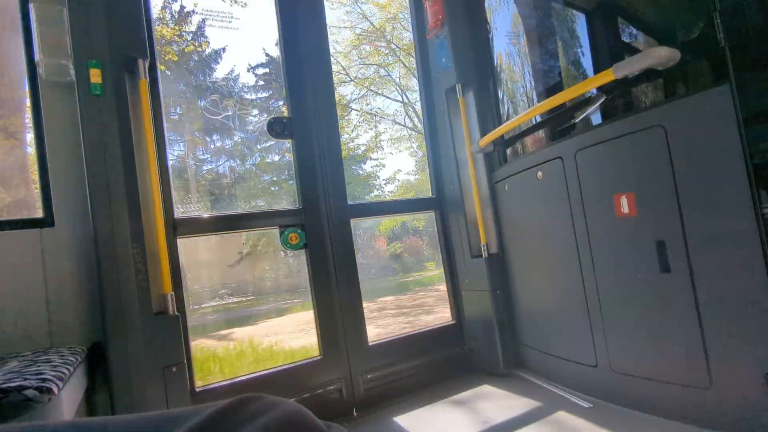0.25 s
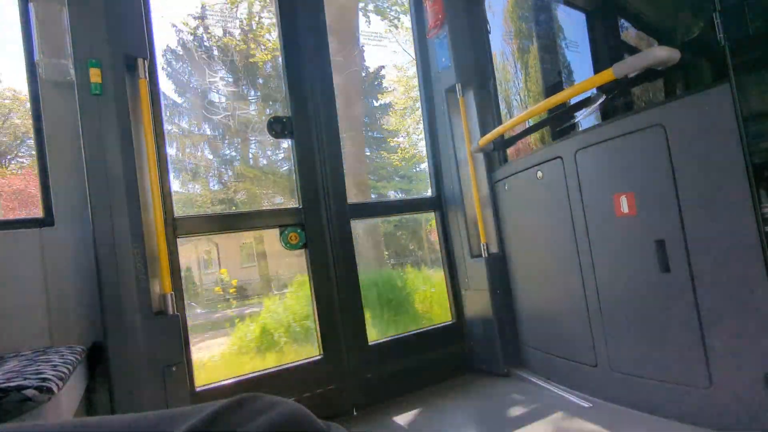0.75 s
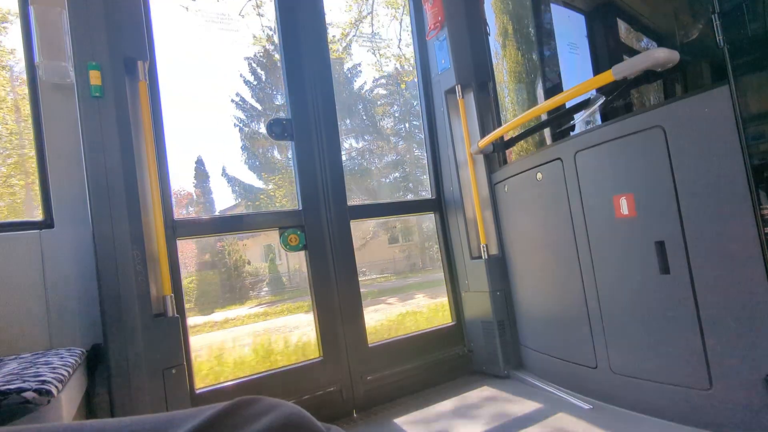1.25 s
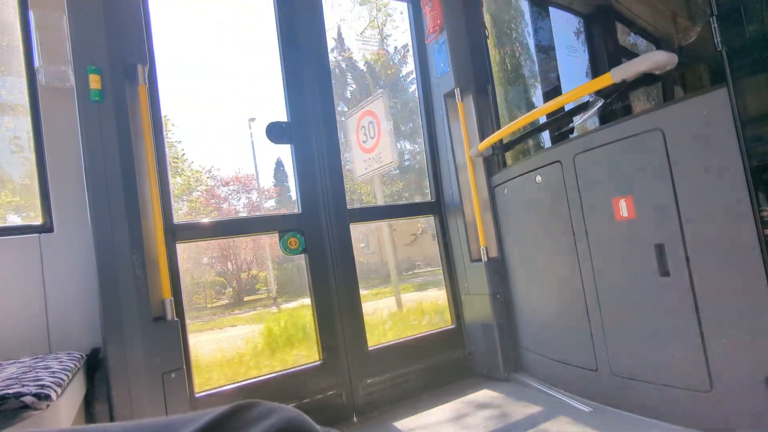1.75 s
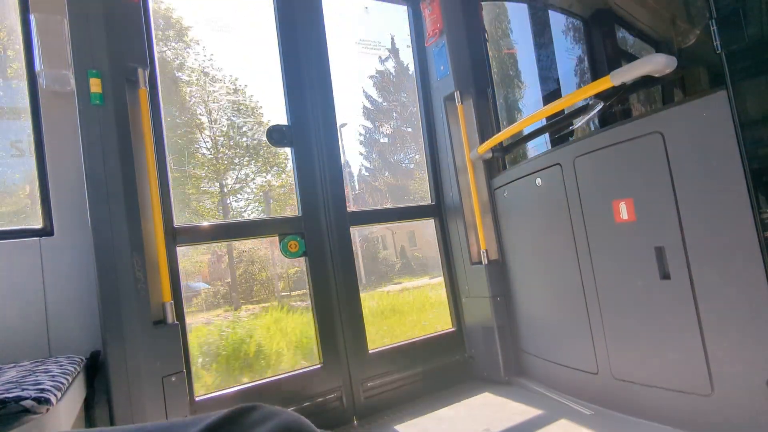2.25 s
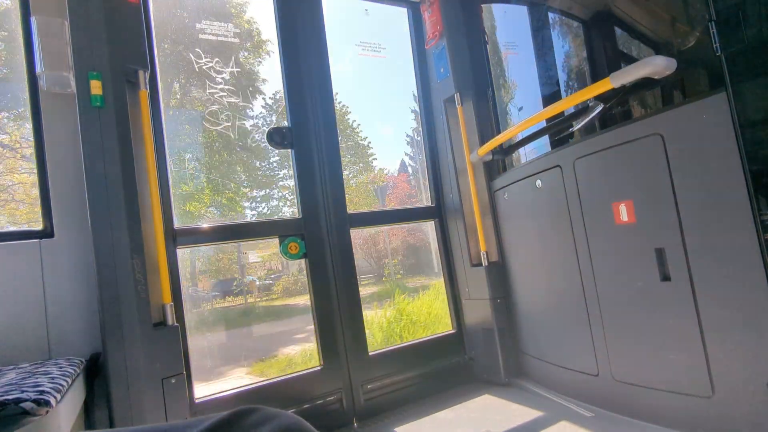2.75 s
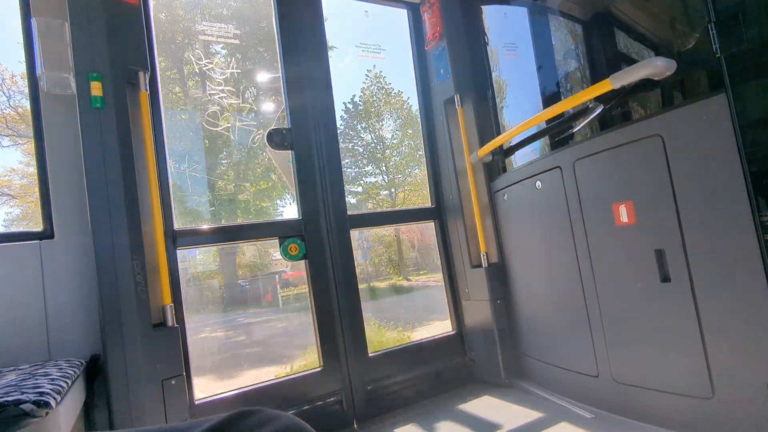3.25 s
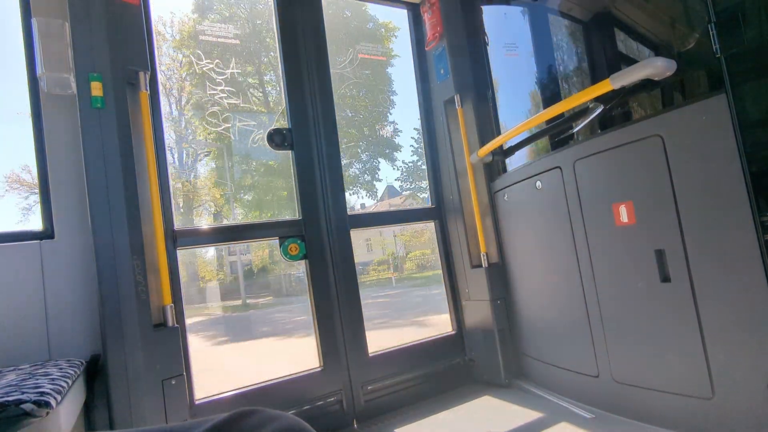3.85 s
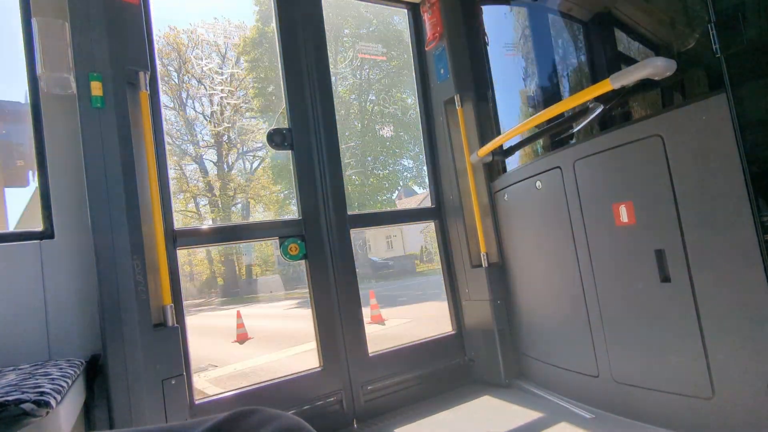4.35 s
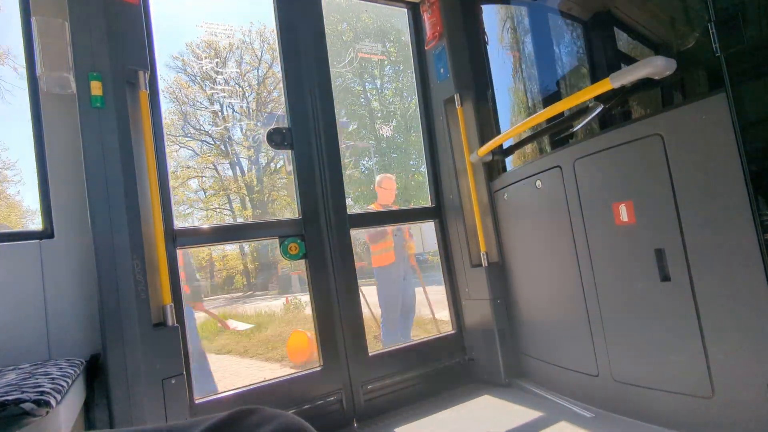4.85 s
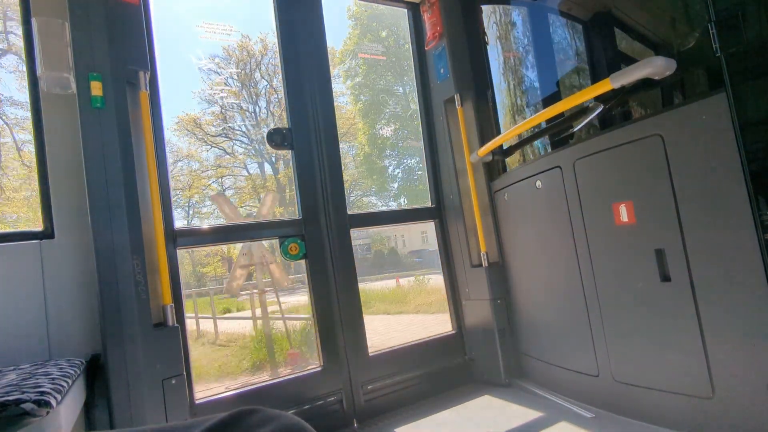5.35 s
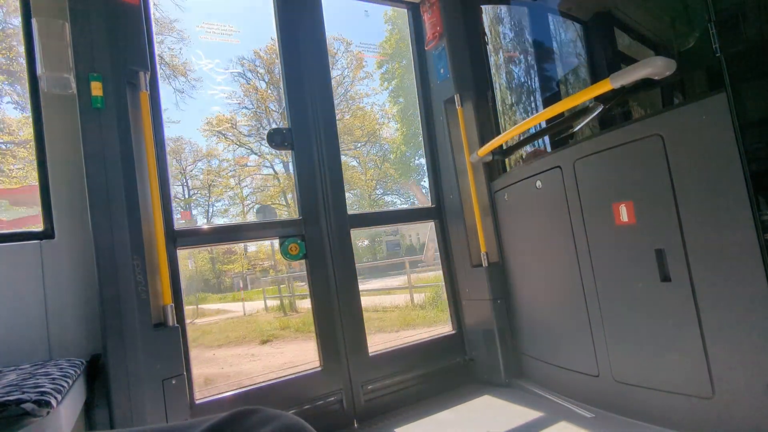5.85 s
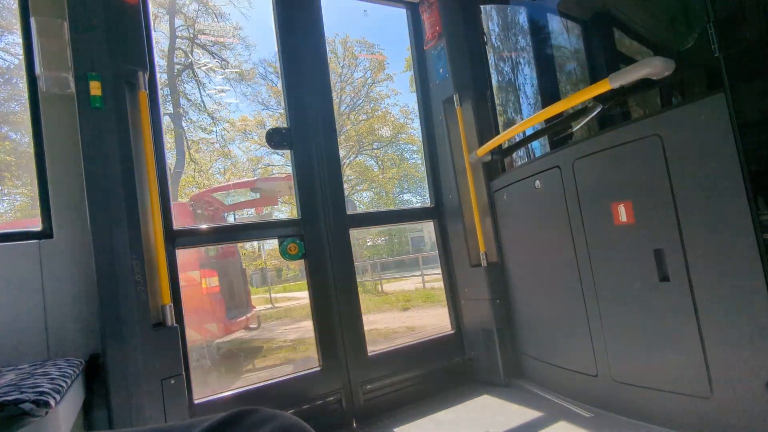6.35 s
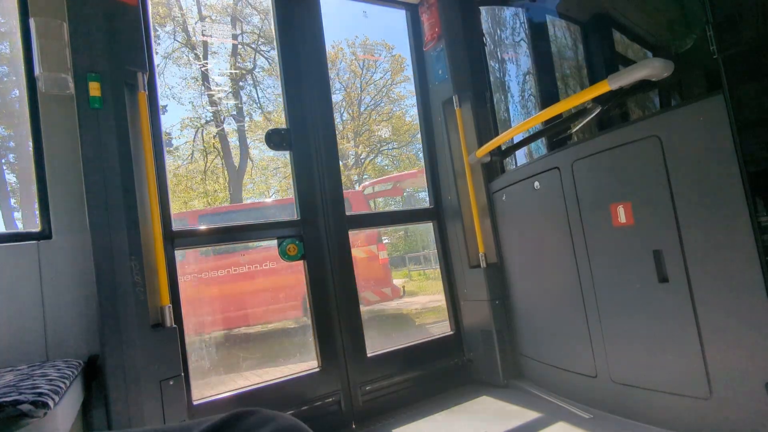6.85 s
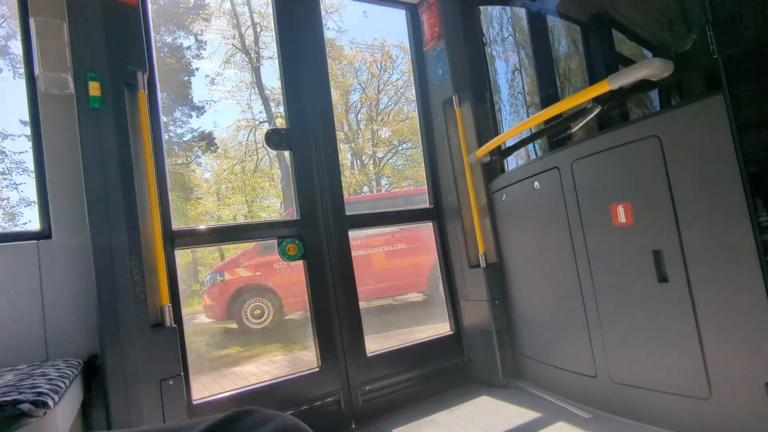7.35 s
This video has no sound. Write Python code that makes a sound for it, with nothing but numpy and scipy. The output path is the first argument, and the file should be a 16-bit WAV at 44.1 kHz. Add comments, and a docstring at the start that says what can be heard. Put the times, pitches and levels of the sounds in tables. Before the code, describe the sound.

Inside a braking tram, wheels roar over a rough crossing with dull thuds, clacks and rattling door fittings, while the motor whine sinks in pitch.

```python
"""Braking tram on a rough crossing

Inside a tram that brakes gently over a rough road crossing, heard from a seat by the door. Filtered noise
makes the wheel roar; short low swings and swells of noise make the blows from the rail. Bursts of ticks make
loose door fittings rattle, after a soft fading hiss at the start. Drive tones fall with the speed, and a wheel
sings briefly three times. Beneath lie steady ventilation (noise and hum), the noisy rush of the converter and
the thin two-tone whistle of the inverter."""
import sys
import numpy as np
from scipy import signal
from scipy.fft import rfft, irfft
from scipy.io import wavfile
from scipy.ndimage import uniform_filter1d

SR = 44100
rng = np.random.default_rng(int(sys.argv[2]) if len(sys.argv) > 2 else 0)


def log_audio(samples):
    """Write samples as a 16-bit WAV file to the path given in sys.argv[1]."""
    # one column per channel
    frames = np.atleast_2d(samples).T
    # limit to full scale, then quantise
    limited = np.clip(frames, -1, 1)
    pcm = np.round(limited * 32767).astype(np.int16)
    wavfile.write(sys.argv[1], SR, pcm)


N = 334719
TAPS = 8192  # filter length in samples
TIME = np.arange(N) / SR
FREQ = np.arange(TAPS + 1) * SR / (2 * TAPS)
LEFT_LAG_S = .00034  # sound from the right reaches the left ear this much later


def undb(db):
    """Turn decibels into a gain."""
    return 10 ** (np.asarray(db) / 20)


def unit(x):
    """Scale to rms 1."""
    return x / np.sqrt(np.mean(x ** 2))


def curves(rows):
    """Join the columns of a table by straight lines in time."""
    s, *columns = np.transpose(rows)
    return [np.interp(TIME, s, column) for column in columns]


def contour(points):
    """Join points by straight lines on a log-frequency axis."""
    hz, value = np.transpose(points)
    return np.interp(np.log(FREQ + 1), np.log(hz), value)


def lift(at_hz, rings):
    """What a set of resonances adds at a frequency, in dB."""
    return sum(db / (1 + (2 * (at_hz - hz) / width) ** 2) for hz, width, db in rings)


def colour(x, spectrum, rings=()):
    """Give noise a broad spectrum with narrow resonances on it; white noise keeps its level."""
    db = contour(spectrum) + lift(FREQ, rings)
    # minimum phase: the filter responds at once and never ahead of its input
    cepstrum = irfft(np.log(undb(db)))[:TAPS]
    response = irfft(np.exp(2 * rfft(cepstrum, 2 * TAPS) - cepstrum[0]))[:TAPS]
    return signal.oaconvolve(x, response[None] / np.linalg.norm(response))[:, :N]


def weigh(x, gain, size=2048):
    """Filter one channel with a smooth complex gain over frequency."""
    response = np.roll(irfft(gain), size)[:2 * size + 1]
    return signal.oaconvolve(x, response, mode="same")


def walk(rate, size=6):
    """Wander smoothly at random: levels held 1 / rate s, then slewed twice; spread 1."""
    held = np.repeat(rng.standard_normal(int(TIME[-1] * rate) + 2), size)
    slewed = unit(uniform_filter1d(uniform_filter1d(held, size), size))
    return np.interp(TIME * rate * size, np.arange(len(slewed)), slewed)


# How alike the noise is at the two ears: f/Hz, correlation (1 is identical)
EAR_LIKENESS = [(40, .94), (120, .94), (290, .9), (600, .72), (1000, .45), (1500, .35), (3000, .15),
                (8000, .25), (15000, .3)]


def field():
    """White noise from all around: alike at both ears in the bass, mostly unrelated in the treble."""
    alike = np.clip(contour(EAR_LIKENESS), -.99, .99)
    mid = weigh(rng.standard_normal(N), np.sqrt((1 + alike) / 2))
    side = weigh(rng.standard_normal(N), np.sqrt((1 - alike) / 2))
    return np.array([mid + side, mid - side])


def tone(hz, waver, waver_hz):
    """A line whose strength and phase wander at each ear as the paths through the cabin shift."""
    phase = (2 * np.pi * (np.cumsum(hz + 0 * TIME) / SR % 1)).astype(np.float32)
    cos, sin = np.cos(phase), np.sin(phase)
    ears = [cos + waver * (cos * walk(waver_hz) + sin * walk(waver_hz)) for ear in range(2)]
    return unit(np.array(ears))


def swell(age, rise_s):
    """The envelope of a blow: up to 1 in rise_s, then dying away."""
    return age / rise_s * np.exp(1 - age / rise_s)


def add(track, s, sound):
    """Mix a short sound into a track at s seconds."""
    part = track[int(s * SR):][:len(sound)]
    part += sound[:len(part)]


def braking(start_s=2.2, ramp_s=4.1):
    """Brake effort from 0 to 1: it comes on evenly and then stays full."""
    return np.clip((TIME - start_s) / ramp_s, 0, 1)


# Gear mesh tone at the start, and how fast drag and the full brake lower it
MESH_HZ, COAST_HZ_PER_S, BRAKE_HZ_PER_S = 701, 4.4, 86


def speed():
    """Speed as a share of the speed at the start: drag and the brake wear it down."""
    return 1 - np.cumsum(COAST_HZ_PER_S + BRAKE_HZ_PER_S * braking()) / SR / MESH_HZ


# Track, smooth, paved, crossing, smooth: t/s, rumble level/dB, rail hiss level/dB (before trims)
TRACK_ROUGHNESS = [(0, -30.5, -46.5), (.65, -29.5, -48), (1, -31, -48.5), (1.63, -32, -47.5),
                   (1.74, -22, -50), (1.92, -21, -45), (2.05, -16.5, -39.5), (3.2, -14, -38),
                   (3.55, -11, -36.5), (4.35, -12.5, -38), (4.9, -11.5, -41), (5.2, -14, -40),
                   (5.38, -20.5, -45.5), (5.7, -19.5, -45), (5.95, -21.5, -49), (6.5, -18, -45.5),
                   (7.05, -22.5, -51.5), (7.59, -24, -59)]
# Colours of floor boom, body rumble, wheel roar and rail hiss: f/Hz, relative level/dB (per Hz)
BOOM_COLOUR = [(15, -54), (25, -31), (32, -36), (45, -9.5), (58, 20.5), (68, 17.5), (85, 14), (130, -47.5)]
RUMBLE_COLOUR = [(40, -25.5), (62, -7.5), (80, -1), (95, 1.5), (140, -3), (190, -11), (300, -27.5),
                 (500, -79)]
ROAR_COLOUR = [(120, -31.5), (220, -3.5), (280, -1.5), (400, -6.5), (600, -7.5), (700, -9), (820, -19.5),
               (1100, -46), (2000, -76)]
RAIL_COLOUR = [(500, -16.5), (850, 6), (1250, 0), (1600, -0.5), (2050, -4), (2500, -14), (3300, -16.5),
               (5000, -20), (9000, -33.5), (15500, -43)]
# Resonances of the car body: f/Hz, width/Hz, lift level/dB (negative is a dip)
BODY_RINGS = [(91, 9, 4.5), (121.3, 8.5, -4.5), (139.3, 33, 5), (182.8, 25.7, 5), (214, 6.8, 4),
              (270.3, 25.6, 6.5), (328.7, 15.4, 5), (394, 28, 4.5), (434, 22, -3), (467.7, 27, 6.5),
              (586.5, 21, 5), (1100, 14, 1.5), (1620, 25, 5)]


def rolling(boom_db=-26, boom_follow=0.27, rumble_db=-2, hiss_db=-0.5):
    """Rough rail shakes the body: boom and rumble below, juddering roar and hiss above."""
    rumble, hiss = curves(TRACK_ROUGHNESS)
    boom = boom_follow * rumble + boom_db
    # the roar follows the rumble and eases as the tram slows
    roar = 0.77 * rumble - 15 * (1 - speed()) - 10
    judder = 0.34 * walk(60)  # dB; the hiss judders 2.6 times as deeply as the roar
    floor = colour(field(), BOOM_COLOUR) * undb(boom)
    body = colour(field(), RUMBLE_COLOUR, BODY_RINGS) * undb(rumble + rumble_db)
    wheels = colour(field() * undb(judder), ROAR_COLOUR, BODY_RINGS) * undb(roar)
    rail = colour(field() * undb(2.6 * judder), RAIL_COLOUR, BODY_RINGS) * undb(hiss + hiss_db)
    return floor + body + wheels + rail


# Gear tones: f as a multiple of the mesh, coasting level/dB, change of level/dB under full brake
GEAR_TONES = [(1, -49, 7), (2, -60, -3), (3.965, -79, 15)]
# The motor's slot whistle and its side line: f as a multiple of the mesh, relative level/dB
SLOT_TONES = [(7.338, 0), (7.51, -10)]
# Strength of the slot whistle: t/s, level/dB before resonances
SLOT_LEVEL = [(0, -64), (3, -66.5), (4.8, -58.5), (5.2, -67), (7.59, -83)]
# Resonances of the drive's casing and mounts: f/Hz, width/Hz, lift level/dB
MOUNT_RINGS = [(448, 20, 8), (498.5, 21, 11.5), (560, 34, 11), (1010, 24, 14), (1107, 30, 12),
               (1359, 41, 14.5), (4490, 190, 12.5), (4760, 60, 6.5), (4978, 22, 8), (5050, 26, 7.5),
               (5112, 16, 5.5)]
# Air whistling through the motor: t/s, level/dB
MOTOR_AIR_LEVEL = [(0, -54.5), (1.7, -56.5), (3, -89), (5, -85), (7.59, -64)]
# Its colour: f/Hz, relative level/dB (per Hz)
MOTOR_AIR_COLOUR = [(1500, -36), (1900, -2), (2120, 4.5), (2280, -9), (2500, -55.5)]


def drive():
    """Gear and slot tones fall with the speed and swell in each resonance; motor air fades, then returns."""
    hz = MESH_HZ * speed() * (1 + 0.00029 * walk(12))
    effort = braking()
    gear, slots = 0, 0
    for multiple, db, load_db in GEAR_TONES:
        level = db + load_db * effort + lift(multiple * hz, MOUNT_RINGS)
        gear = gear + tone(multiple * hz, waver=.65, waver_hz=26) * undb(level)
    for multiple, db in SLOT_TONES:
        level = db + lift(multiple * hz, MOUNT_RINGS)
        slots = slots + tone(multiple * hz, waver=.35, waver_hz=36) * undb(level)
    air = colour(field(), MOTOR_AIR_COLOUR) * undb(curves(MOTOR_AIR_LEVEL)[0])
    return gear + slots * undb(curves(SLOT_LEVEL)[0]) + air


# Bursts of chatter from the door fittings, after a soft fading hiss at the start (first row):
# t/s, peak level/dB before bounce, build-up t/s
RATTLE_BURSTS = [(0, -59, 0.17), (1.962, -59, .008), (2.21, -51, 0.054), (2.51, -49.5, .06),
                 (2.8, -57, 0.044), (2.998, -46, .003), (3.028, -47.5, .004), (3.145, -47, .004),
                 (3.178, -51, .003), (3.21, -49, .003), (3.256, -43.5, 0.013), (3.303, -31, .11),
                 (3.56, -44.5, 0.093), (3.69, -44, 0.057), (3.905, -40.5, .035), (4.17, -43.5, 0.11),
                 (4.48, -46.5, 0.076), (4.8, -44.5, .05), (4.89, -46, 0.055), (5.228, -53, .01),
                 (6.465, -46, 0.022), (6.515, -40.5, 0.0054), (6.538, -44, 0.01), (7.12, -58, .008)]
# Colour of the fittings: f/Hz, relative level/dB (per Hz)
FITTING_COLOUR = [(500, -35), (1200, -3), (2100, 15.5), (2700, 6), (3500, 7.5), (5000, 4), (6300, 4),
                  (7500, 3), (9400, -0.5), (11500, -2.5), (14500, -7), (15700, -16)]
# Their resonances: f/Hz, width/Hz, lift level/dB
RINGS_OF_FITTINGS = [(2840, 50, 4), (3260, 40, 4), (3424, 30, 7), (5940, 50, 4), (7422, 30, 7),
                     (9008, 30, 7), (9250, 140, 3), (9800, 40, 6)]


def rattle(ticks_per_s=3600, fall_s=0.063, cabin_db=1, panel_db=-5):
    """After a soft fading hiss, loose fittings bounce in bursts of ticks, in a wash of reflections."""
    power, age = np.zeros(N), TIME[:SR // 2]
    for s, db, rise_s in RATTLE_BURSTS:
        fall = np.exp(-np.maximum(age - rise_s, 0) / fall_s)
        add(power, s, np.minimum(age / rise_s, 1) * (undb(db) * fall) ** 2)
    shake = np.sqrt(power) * undb(1.4 * walk(85))  # bouncing wavers the level
    ticks = unit((rng.random(N) < ticks_per_s / SR) * np.sign(rng.standard_normal(N)))
    # the ticks reach the left ear a little later
    ears = np.array([np.roll(ticks, int(LEFT_LAG_S * SR)), ticks])
    chatter = unit(ears + undb(cabin_db) * field()) * shake
    fittings = colour(chatter, FITTING_COLOUR, RINGS_OF_FITTINGS)
    panels = colour(field() * shake, RAIL_COLOUR, BODY_RINGS) * undb(panel_db)
    return fittings + panels


# Colour of the ventilation: f/Hz, relative level/dB (per Hz)
VENT_COLOUR = [(200, 9), (700, 0), (1100, 0.5), (1700, -12), (3000, -7.5), (4200, -22.5), (5000, -17),
               (6000, -10.5), (7000, -24.5), (7700, -14.5), (9000, -57), (15500, -38)]
# Its humps: f/Hz, width/Hz, lift level/dB
VENT_RINGS = [(1147, 4.6, 18), (5300, 200, 3.3), (9760, 120, 8)]
# Hum of the blowers: f/Hz, level/dB
BLOWER_HUM = [(220.7, -42), (366, -41), (466, -47)]


def ventilation(vent_db=-52):
    """Moving air hisses with a slight waver while the blowers hum at fixed pitches."""
    hiss = colour(field(), VENT_COLOUR, VENT_RINGS) * undb(vent_db + .4 * walk(1))
    hum = sum(undb(db) * tone(hz, waver=0.74, waver_hz=14) for hz, db in BLOWER_HUM)
    return hiss + hum


# Colour of the traction converter's rush: f/Hz, relative level/dB (per Hz)
CONVERTER_COLOUR = [(3000, -71), (3550, -6), (3900, 5), (4150, 8), (4480, 1.5), (4750, -11.5), (5300, -56)]


def converter(rush_db=-51.5, flicker_db=0.27):
    """The traction converter gives a narrow, faintly flickering rush, stronger at the right ear."""
    ears = undb([[-2.25], [2.25]])  # left, right
    return colour(field(), CONVERTER_COLOUR) * ears * undb(rush_db + flicker_db * walk(40))


# Strength of the inverter whistle: t/s, level/dB of its main line
INVERTER_LEVEL = [(0, -68.5), (1.1, -71.5), (2, -68), (2.4, -66), (3.2, -61.5), (4.2, -66), (5.3, -67.5),
                  (5.7, -71), (7.59, -66.5)]
# Its lines: f/Hz, relative level/dB
INVERTER_TONES = [(11977, 0), (11919, -10)]


def inverter():
    """The inverter's switching whistles thinly on two close, steady pitches."""
    whistle = sum(undb(db) * tone(hz, waver=0.49, waver_hz=30) for hz, db in INVERTER_TONES)
    return whistle * undb(curves(INVERTER_LEVEL)[0])


# Blows from the rail: t/s, thud level/dB, clack level/dB, rim scrape level/dB, floor boom level/dB,
# rise of the clack t/s (levels before the trims below)
RAIL_BLOWS = [(1.684, -21.5, -22, -47, -29, 0.017), (2.081, -21, -31, -50, -32, 0.03),
              (2.581, -16, -21.5, -43, -43, 0.014), (2.919, -9, -18, -40, -28, 0.022),
              (3.234, -5.5, -13, -34.5, -15, 0.028), (3.288, -6, -14, -32.5, -13.5, 0.024),
              (3.509, -12, -10.5, -33, -34, 0.02), (3.574, -3.5, -11, -32.5, -32, 0.024),
              (3.655, -7.5, -20, -48, -20, 0.013), (3.872, -8, -16, -33.5, -14.5, 0.034),
              (3.93, -24, -14, -34.5, -30, 0.026), (4.147, -11, -10.5, -34, -32, 0.018),
              (4.187, -15, -7, -28.5, -32, 0.014), (4.443, -7.5, -12.5, -39, -41, 0.0067),
              (4.465, -23, -7.5, -36.5, -51, 0.011), (4.727, -15, -14.5, -40, -40, 0.018),
              (4.783, -7, -13.5, -41, -37, 0.013), (4.858, -10.5, -16, -37, -33, 0.016),
              (5.196, -14, -13.5, -49, -27, 0.025), (5.26, -30, -27, -60, -21.5, 0.0092),
              (6.431, -4.5, -23.5, -44, -24, 0.041), (6.836, -30, -17, -44.5, -31, 0.0093),
              (6.856, -9.5, -19, -54, -26.5, 0.017), (6.982, -19, -38, -64, -24.5, .01),
              (7.228, -9.5, -22.5, -48, -35, 0.02)]


def blows(thud_hz=88, thud_rise_s=0.013, boom_rise_s=0.083, scrape_rise_s=0.033,
          thud_db=-0.5, clack_db=-3, boom_db=-3, scrape_db=-0.5):
    """A wheel drops on a gap: the floor swings and booms, the bogie clacks and the rim scrapes."""
    thuds, clacks, scrapes, booms = np.zeros((4, N))
    age = TIME[:SR // 2]
    swing = np.sin(2 * np.pi * thud_hz * age) * swell(age, thud_rise_s)
    # overlapping noises add as power, so all but the thuds are squared here
    for s, thud, clack, scrape, boom, rise_s in RAIL_BLOWS:
        add(thuds, s, undb(thud) * swing)
        add(clacks, s, (undb(clack) * swell(age, rise_s)) ** 2)
        add(scrapes, s, (undb(scrape) * swell(age, scrape_rise_s)) ** 2)
        add(booms, s, (undb(boom) * swell(age, boom_rise_s)) ** 2)
    floor = undb(thud_db) * thuds + undb(boom_db) * colour(field(), BOOM_COLOUR) * np.sqrt(booms)
    bogie = undb(clack_db) * colour(field() * np.sqrt(clacks), ROAR_COLOUR, BODY_RINGS)
    grit = undb(scrape_db + 1.0 * walk(140))  # the scrape is rough
    rim = colour(field() * np.sqrt(scrapes) * grit, RAIL_COLOUR, BODY_RINGS)
    return floor + bogie + rim


# Brief singing of a wheel: t/s at its peak, f/Hz, level/dB, time from peak to 1/e t/s
WHEEL_SINGS = [(4.55, 1450, -47, 0.16), (5.753, 1520, -48, 0.065), (7.03, 1077, -53.5, 0.18)]


def singing():
    """A wheel rubs the rail and rings briefly in one of its modes."""
    total = 0
    for s, hz, db, length_s in WHEEL_SINGS:
        envelope = undb(db) * np.exp(-((TIME - s) / length_s) ** 2)
        total = total + envelope * tone(hz, waver=1.0, waver_hz=28.8)
    return total


# Shading of the left ear from the running gear: f/Hz, level/dB
LEFT_EAR_SHADE = [(50, -.8), (130, 0), (280, .5), (550, -.6), (1100, -2), (2200, -1.4), (4000, -1.5),
                  (8000, 0)]


def scene():
    """The running gear lies to the right: at the left ear it is later, and weaker from about 1 to 4 kHz."""
    left, right = rolling() + drive() + blows() + singing()
    lag = np.exp(-2j * np.pi * FREQ * LEFT_LAG_S)
    left = weigh(left, undb(contour(LEFT_EAR_SHADE)) * lag)
    return np.array([left, right]) + rattle() + ventilation() + converter() + inverter()


def record(dry, top_hz=15550, fade_s=.004):
    """Round the highest peaks, fade both ends briefly and cut everything above top_hz."""
    rounded = dry / (1 + dry ** 8) ** (1 / 8)
    fade = np.minimum(np.minimum(TIME, TIME[::-1]) / fade_s, 1)
    low_pass = signal.ellip(10, .2, 70, top_hz, fs=SR, output="sos")
    return signal.sosfilt(low_pass, rounded * fade)


dry = scene()
out = record(dry)
log_audio(out)
```